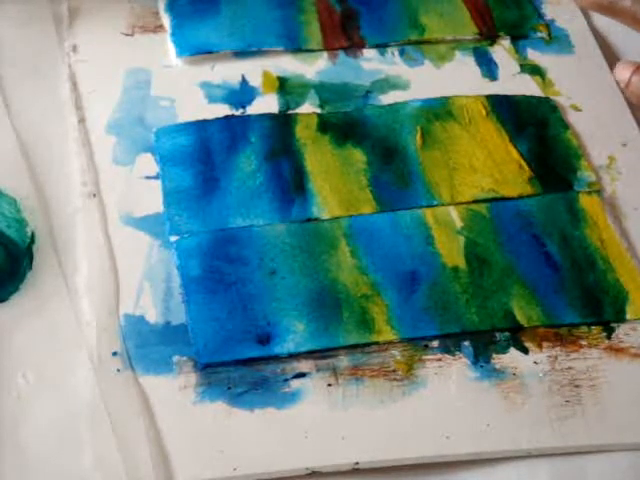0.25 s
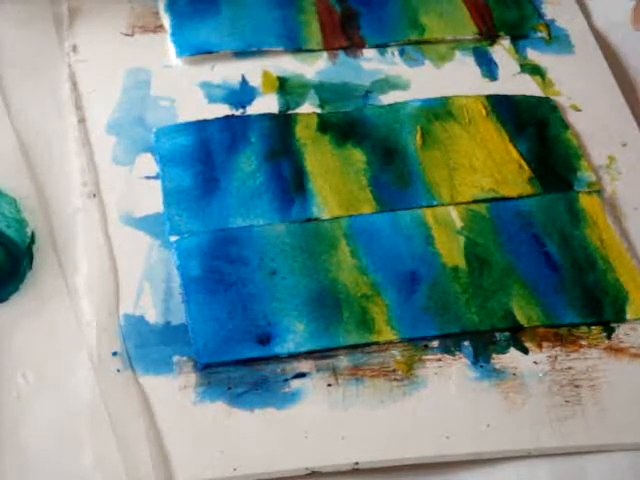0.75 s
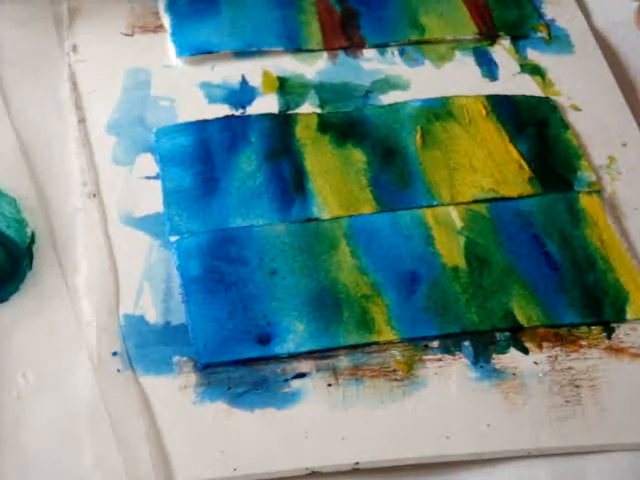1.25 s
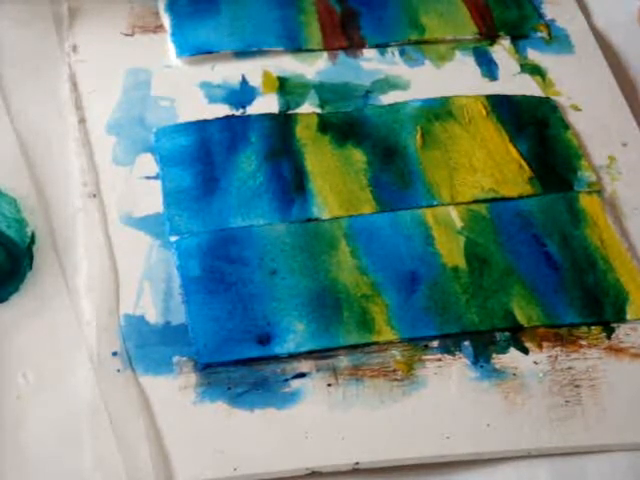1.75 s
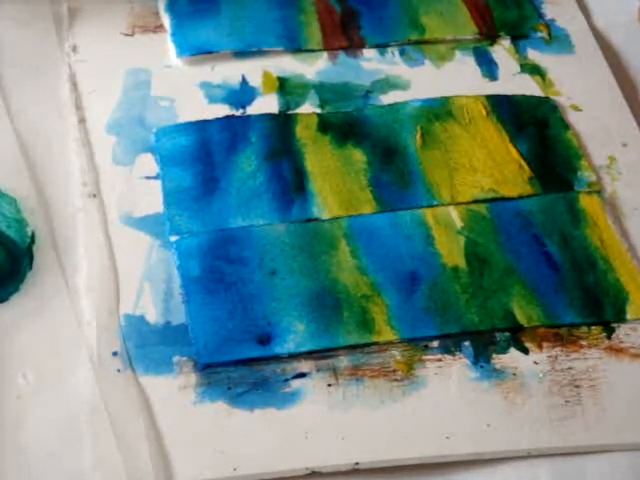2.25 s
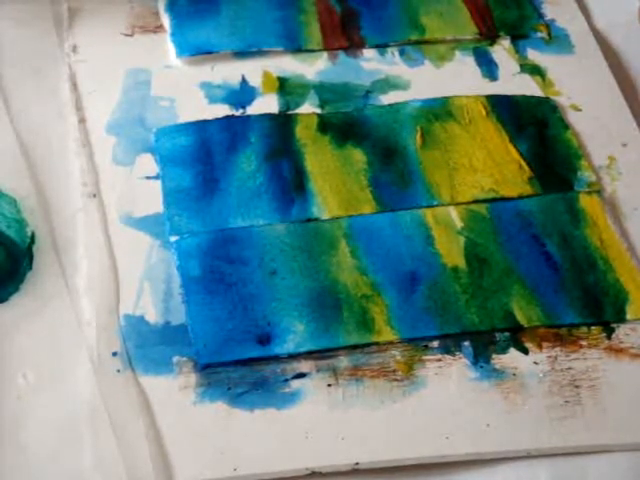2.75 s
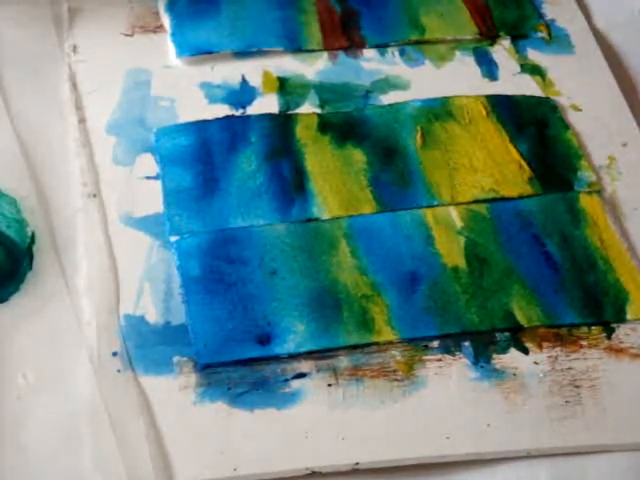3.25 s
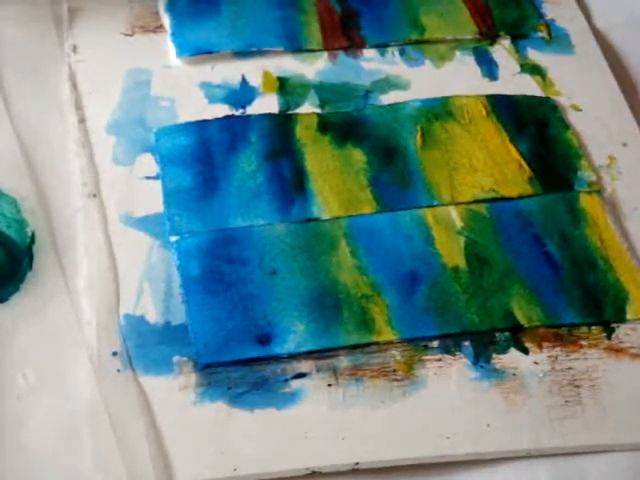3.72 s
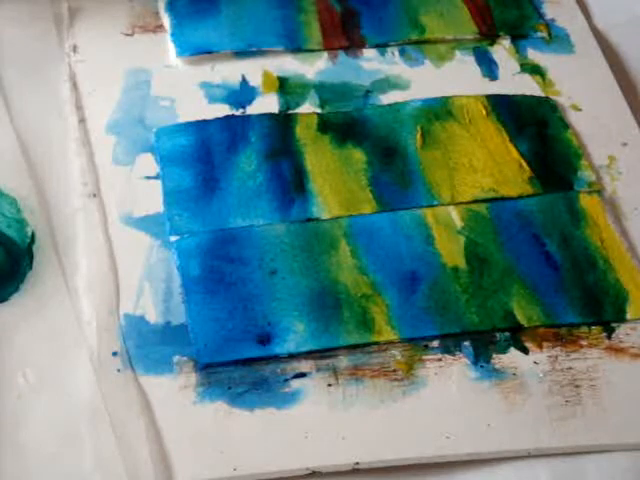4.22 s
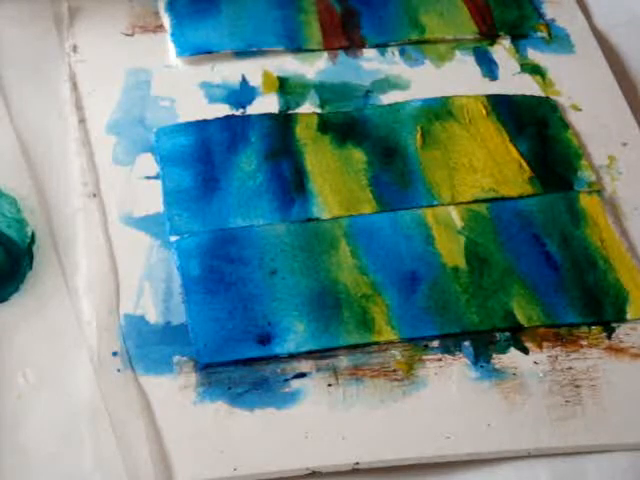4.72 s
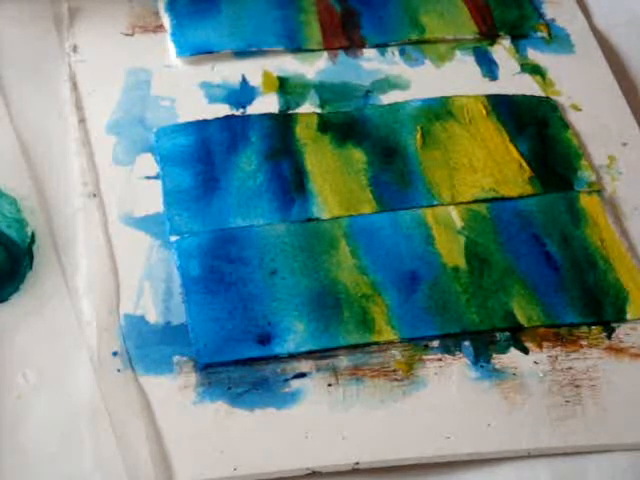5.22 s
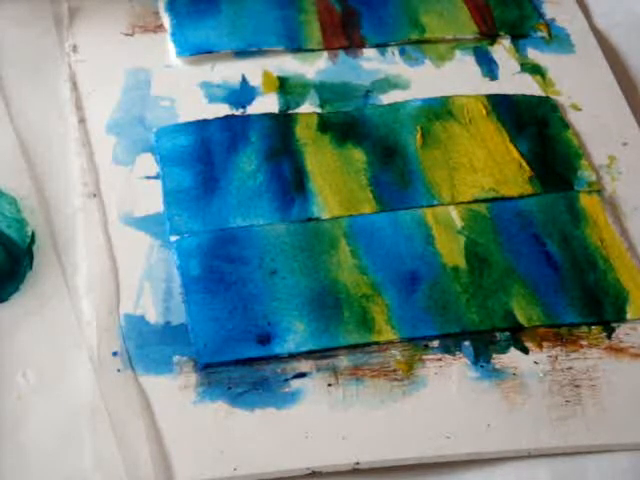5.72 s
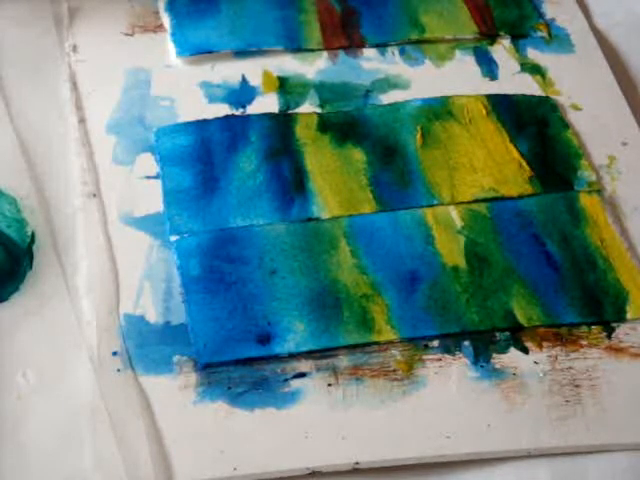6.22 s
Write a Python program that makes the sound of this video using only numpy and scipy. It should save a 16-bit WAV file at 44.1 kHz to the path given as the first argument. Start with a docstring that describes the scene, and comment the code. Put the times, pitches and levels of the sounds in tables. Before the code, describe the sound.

Light, quickly damped clinks of a paintbrush against a water jar open the scene, running into a series of duller dabs and gentle sloshing. The water settles into sparse, high drips and one small gurgle. Near the end comes a single crisp tap on a table with a slight rebound, then short, soft bristle wipes. Everything sounds near, over the faint hiss of a small room.

```python
"""In a small, quiet room a paintbrush is rinsed in a jar of water. Its handle clinks on the wall and
its bristles are dabbed on the bottom, each impact exciting the jar's damped modes. Stirring and
falling drops trap air, which resonates as bubbles. The brush then taps the table, bounces once
and is wiped in a few short strokes of friction noise."""
import sys
import numpy as np
from scipy import signal
from scipy.fft import rfft, irfft, next_fast_len
from scipy.io import wavfile

SR = 44100
rng = np.random.default_rng(int(sys.argv[2]) if len(sys.argv) > 2 else 0)


def generate_wav(signal):
    """Clip the signal to [-1, 1] and save it as 16-bit WAV at the path in sys.argv[1]."""
    frames = np.transpose(np.atleast_2d(signal))
    scaled = np.clip(frames, -1, 1) * 32767
    pcm = np.round(scaled).astype(np.int16)
    wavfile.write(sys.argv[1], SR, pcm)


N = 285282
TIME = np.arange(N) / SR
RING_TIME = TIME[:SR // 2]
TOP_HZ = 10250

# modes of the damped jar, plus the low thump of the table beneath it: pitch_hz, level_db, t60_s
JAR_ON_TABLE = [(133.4, -29.5, 0.21), (311, -24.5, 0.079), (570, -9, 0.042), (745.7, -15, 0.046),
                (920, -10, 0.031), (1059, -2.5, 0.027), (1156, -2, 0.035), (1405, -4, 0.013),
                (1845, -7, 0.027), (2145, -5.5, 0.025), (2360, -1.5, 0.015), (2600, -5.5, 0.02),
                (2957, -1, 0.016), (3280, -1, 0.016), (3690, -2.5, 0.025), (4100, -2.5, 0.017),
                (4606, 0, 0.0095), (5300, -2, 0.0065), (6250, -0.5, 0.0046), (7570, -11, 0.005),
                (8500, -11, 0.0024)]
# drops that trap a distinct bubble: start_s, level_db, pitch_hz
DROPS = [(.536, -36.5, 1930), (.747, -34, 1160), (0.807, -26.5, 3140), (0.9, -34, 3830), (.914, -29, 1980),
         (.9250, -19.5, 3950), (1.005, -30.5, 1890), (1.352, -29.5, 2020), (1.353, -31.5, 3280),
         (2.066, -32.5, 4100), (2.092, -32, 2650), (2.124, -39, 1150), (2.158, -33.5, 3040),
         (2.368, -32, 3090), (2.691, -40.5, 2300), (2.747, -41, 4200), (3.502, -27.5, 2450),
         (3.507, -32.5, 2750), (3.707, -31, 2490), (3.733, -34.5, 1565), (3.840, -37.5, 1213),
         (3.842, -36, 2040)]


def amp(db):
    """Decibels express an amplitude ratio on a logarithmic scale."""
    return 10 ** (np.asarray(db) / 20)


def unit_rms(x):
    """Normalisation to unit mean power."""
    return x / np.sqrt(np.mean(x ** 2) + 1e-20)


def curve_at(points, hz):
    """Interpolation of (frequency_hz, value) points on a logarithmic frequency axis."""
    knots_hz, values = np.transpose(points)
    return np.interp(np.log(hz + 1), np.log(knots_hz), values)


def add(track, start_s, sound):
    """Superposition: a delayed sound sums into the track."""
    part = track[round(start_s * SR):][:len(sound)]
    part += sound[:len(part)]


def swell(movements, attack_share, depth_db=19.5):
    """Incoherent addition: envelopes that rise and fall exponentially sum in power."""
    power = np.zeros(N)
    for peak_s, db, length_s in movements:
        away = np.maximum((peak_s - TIME) / attack_share, (TIME - peak_s) / (1 - attack_share))
        power += amp(db - depth_db * np.minimum(away / length_s, 10)) ** 2
    return np.sqrt(power)


def coloured(x, spectrum):
    """Causal, minimum-phase filtering through (frequency_hz, gain_db) points."""
    size = 2 * next_fast_len(len(x))
    cepstrum = irfft(np.log(amp(curve_at(spectrum, np.fft.rfftfreq(size, 1 / SR)))))
    cepstrum[1:size // 2] *= 2
    cepstrum[size // 2 + 1:] = 0
    return irfft(rfft(x, size) * np.exp(rfft(cepstrum)))[:len(x)]


def noise(spectrum):
    """Spectral shaping of white noise, at unit power."""
    return unit_rms(coloured(rng.standard_normal(N), spectrum))


def burst(t60_s):
    """A broadband transient: white noise in exponential decay."""
    return rng.standard_normal(len(RING_TIME)) * amp(-60 * RING_TIME / t60_s)


def ring(modes, scatter_db):
    """Free vibration: a sum of damped modes of scattered strength and alternating sign."""
    hz, db, t60_s = np.transpose(modes)[:, :, None]
    signs = (-1) ** np.arange(len(db))[:, None]
    strength = signs * amp(db + scatter_db * rng.standard_normal(db.shape))
    return np.sum(strength * amp(-60 * RING_TIME / t60_s) * np.sin(2 * np.pi * hz * RING_TIME), axis=0)


def room_noise():
    """The noise floor: steady broadband sound, strongest in the low middle range."""
    # ambient spectrum: frequency_hz, density_db
    spectrum = [(15, -51), (25, -26), (156, -6), (181, -3.5), (233, -1.5), (322, -1), (519, -1.5),
                (560, -1), (924, -3.5), (1560, -6.5), (2170, -8), (3240, -10.5), (4370, -12.5),
                (8600, -15.5), (10000, -18.5), (13000, -105.5), (22000, -120)]
    return noise(spectrum)


def in_room(x, wet_db, standing_db=-55, wall_db=-11, wall_delay_s=0.0122):
    """Convolution with the room's response: direct sound, one reflection, diffuse tail, standing waves."""
    # reverberation time: frequency_hz, t60_s
    decay_times = [(150, 0.31), (400, 0.56), (1000, 0.32), (3000, 0.32), (8000, 0.31)]
    # colour of the diffuse tail: frequency_hz, gain_db
    tail_colour = [(120, -4), (250, -4.5), (450, -3.5), (900, 0), (2500, 0), (9000, -5)]
    # standing waves of the room and furniture: pitch_hz, level_db, t60_s
    standing_waves = [(135, -11.5, 0.24), (313.2, -2, 0.39), (398, 0.5, 0.47), (456, 0.5, 0.45),
                      (577, -6, 0.29), (648, -2, 0.58), (766, -7.5, 0.32), (907, -5.5, 0.33),
                      (1011, -9, 0.16), (1162, -9.5, 0.42), (1180, -12.5, 0.25)]
    hz, t, bands = signal.stft(rng.standard_normal(len(RING_TIME)), SR, nperseg=256)
    bands *= amp(-60 * t / curve_at(decay_times, hz)[:, None])
    tail = signal.istft(bands, SR, nperseg=256)[1][:len(RING_TIME)]
    tail *= 1 - np.exp(-RING_TIME / 0.003)  # the diffuse field builds up
    echoes = amp(wet_db) * coloured(tail / np.linalg.norm(tail), tail_colour)
    echoes += amp(standing_db) * ring(standing_waves, scatter_db=1)
    direct = 1.0 * (RING_TIME == 0)
    add(echoes, wall_delay_s, amp(wall_db) * coloured(direct, [(600, 2.5), (1500, -7), (6000, -7.5)]))
    return signal.fftconvolve(x, direct + echoes)[:len(x)]


def shuffles():
    """Structure-borne sound: something soft shifts on the table and is heard through its top."""
    # movements on the table: peak_s, level_db, length_s
    shifts = [(.463, -47, .075), (3.395, -52.5, .17)]
    # dull spectrum of the table top: frequency_hz, density_db
    thud = [(25, -16), (130, -18), (230, 2.5), (450, -1.5), (800, -4.5), (2000, -25), (8000, -46)]
    return in_room(noise(thud) * swell(shifts, attack_share=0.48), wet_db=3)


def wipes(grain_db=3.5):
    """Friction noise: many bristles slip at once, giving a grainy hiss under each stroke."""
    # drying strokes: peak_s, level_db, length_s
    strokes = [(4.775, -52, 0.13), (5.724, -37, 0.069), (5.82, -52, .22), (6.078, -49, 0.18),
               (6.345, -54.5, .24)]
    # hiss of the bristles: frequency_hz, density_db
    spectrum = [(100, -21), (350, 1.5), (1200, 2.5), (2600, 3), (4000, -1.5), (7000, -3.5), (10000, -9.5)]
    grain = amp(grain_db * noise([(300, 7), (1200, -21), (5000, -55)]))
    hiss = unit_rms(grain * noise(spectrum))
    return in_room(hiss * swell(strokes, attack_share=0.32), wet_db=-7)


def ticks():
    """Impact without resonance: tiny, bright ticks against the jar's wall."""
    # the handle rebounds after its first clink, then two faint specks: start_s, peak_db
    contacts = [(0.243, -25.5), (2.241, -31), (4.068, -36)]
    # colour of a tick: frequency_hz, gain_db
    tick_colour = [(1000, -17), (4500, -2), (7200, 1), (10000, -3.5)]
    track = np.zeros(N)
    for start_s, db in contacts:
        tick = coloured(burst(t60_s=0.014), tick_colour)
        add(track, start_s, amp(db) * tick / np.abs(tick).max())
    return in_room(track, wet_db=-3)


def bubble(hz, cycles, rise_octaves, attack_s=0.00018):
    """Bubble resonance: trapped air rings down 60 dB in about `cycles`, rising as it nears the surface."""
    t60_s = cycles / hz
    t = RING_TIME[:int(t60_s * SR) + 2]
    pitch_hz = hz * 2 ** (rise_octaves * t / t60_s)
    wave = np.sin(2 * np.pi * np.cumsum(pitch_hz) / SR)
    return wave * amp(-60 * t / t60_s) * (1 - np.exp(-t / attack_s))


def slosh(count=3200, until_s=4.0, centre_hz=2100, log_spread=0.49, scatter_db=4):
    """Air entrainment: stirring and falling drops make a crowd of small, short-lived bubbles."""
    # the brush stirs the water: peak_s, relative_db, length_s
    stirs = [(.45, -58, 0.11), (.945, -40, 0.21), (1.05, -46.5, 0.35), (1.42, -55, 0.79), (2.14, -54, .25),
             (2.30, -55.5, 0.48)]
    crowd = np.zeros(N)
    for start_s, pitch, size in zip(rng.uniform(0, until_s, count), *rng.standard_normal((2, count))):
        hz = np.clip(centre_hz * np.exp(log_spread * pitch), 1000, TOP_HZ)
        add(crowd, start_s, amp(scatter_db * min(size, 2)) * bubble(hz, cycles=14, rise_octaves=0.25))
    # each drop leaves a faint, brief wake of fine bubbles
    wakes = swell([(start_s, db - 26, 0.14) for start_s, db, _ in DROPS], attack_share=0.073)
    motion = np.hypot(swell(stirs, attack_share=0.41), wakes)
    return in_room(crowd / np.std(crowd[crowd != 0]) * motion, wet_db=-5)


def glug(peak_s=3.585, level_db=-40, length_s=0.08, pitch_hz=1014, octaves_per_s=18.8, froth=0.83):
    """Cavity resonance: water drains off the bristles and a closing, frothy pocket whoops upward."""
    hz = pitch_hz * 2 ** np.clip(octaves_per_s * (TIME - peak_s), -0.6, 0.35)
    flutter = [noise([(170, 0), (340, -14), (1360, -50)]) for _ in range(2)]
    modulation = 1 + froth * (flutter[0] + 1j * flutter[1])  # in amplitude and phase
    cavity = modulation * np.exp(2j * np.pi * np.cumsum(hz) / SR)
    envelope = swell([(peak_s, level_db, length_s)], attack_share=0.64)
    return in_room(envelope * unit_rms(cavity.real), wet_db=-8.5)


def drops(splat_db=-10):
    """Drop impact: a tiny splat sets a bubble ringing; small, high bubbles die soonest."""
    track = np.zeros(N)
    for start_s, db, hz in DROPS:
        splat = coloured(burst(t60_s=0.03), [(hz / 4, -10), (hz, 5), (2 * hz, -5), (4 * hz, -10)])
        plink = amp(splat_db) * splat
        add(plink, 0, bubble(hz, cycles=59, rise_octaves=0.16))
        add(track, start_s, in_room(amp(db) * plink, wet_db=-4))
    return track


def strikes(blows, modes, crack_db, crack_t60_s, wet_db, click_db):
    """Impact excitation: each blow cracks and rings the modes; soft contact favours bass over treble."""
    track = np.zeros(N)
    for start_s, peak_db, bass_db, treble_db, click_hz in blows:
        crack = amp(crack_db) * burst(crack_t60_s)
        contact = [(60, bass_db - 17.5), (150, bass_db), (600, bass_db), (1150, 0.46 * bass_db),
                   (2600, 0.0066), (7000, treble_db)]
        blow = coloured(ring(modes, scatter_db=2) + crack, contact)
        # the point of contact sets the pitch of the click
        blow = coloured(blow, [(click_hz / 1.52, 0), (click_hz, click_db), (click_hz * 1.43, 0)])
        add(track, start_s, in_room(amp(peak_db) * blow / np.abs(blow).max(), wet_db))
    return track


def table_taps():
    """Plate vibration: the brush strikes the table top and rebounds once."""
    # tap and bounce: start_s, peak_db, bass_db, treble_db, click_hz
    taps = [(5.2167, -15.5, 2.5, 0.5, 1500), (5.2775, -32, 6, 0, 3800)]
    # modes of the table top: pitch_hz, level_db, t60_s
    modes = [(243, -22, .1), (310, -17, 0.08), (565, -15, 0.061), (940, -2, 0.01), (1130, -1.5, 0.022),
             (1503, -2, 0.025), (1910, -4.5, 0.01), (2110, -4, 0.024), (2556, -1, 0.025), (3060, -1, 0.011),
             (3480, -1, 0.017), (4100, 0.5, 0.014), (5170, -6.5, 0.0038), (7500, -13, 0.0016)]
    return strikes(taps, modes, crack_db=-4.5, crack_t60_s=0.0035, wet_db=-3.5, click_db=-0.5)


def dabs(gentle_db=-22, bass_db=18.5, bass_loss_per_db=1.06, bottom_hz=1030):
    """Cushioned impact: bristles soften each blow on the bottom, less so when pressed hard."""
    # bristles meet the bottom: start_s, peak_db, treble_db
    contacts = [(0.9411, -22, -5), (1.0776, -15, -6.5), (1.2211, -22.5, -5), (1.3662, -23, -11),
                (1.5124, -21.5, -10), (1.6573, -22, -20), (1.8095, -23.5, -36)]
    blows = [(start_s, db, bass_db - bass_loss_per_db * (db - gentle_db), treble_db, bottom_hz)
             for start_s, db, treble_db in contacts]
    return strikes(blows, JAR_ON_TABLE, crack_db=-13, crack_t60_s=0.036, wet_db=-1, click_db=2.5)


def clinks(firm_db=-12.5, bass_db=-3):
    """Hard impact: the firmer the handle hits the jar's wall, the more it excites the high modes."""
    # handle meets the wall: start_s, peak_db, click_hz
    contacts = [(0.2332, -17, 2900), (0.3986, -11, 4440), (0.4678, -23.5, 3300), (0.554, -19.5, 3830),
                (.6068, -13.5, 2840), (.9510, -16.5, 3240), (1.2700, -27.5, 2190), (1.4143, -29, 2300)]
    blows = [(start_s, db, bass_db, db - firm_db, click_hz) for start_s, db, click_hz in contacts]
    return strikes(blows, JAR_ON_TABLE, crack_db=-13, crack_t60_s=0.051, wet_db=-0.5, click_db=4.5)


def scene():
    """Superposition of jar, table, water and rubbing over the room's noise, in one channel."""
    jar = clinks() + dabs()
    table = table_taps()
    water_and_ticks = drops() + ticks() + glug() + amp(3.5) * slosh()
    rubbing = wipes() + shuffles()
    return (jar + table + water_and_ticks + rubbing + amp(-52) * room_noise())[None]


def record(dry):
    """Band limiting: a linear-phase low-pass removes the highest treble."""
    low_pass = signal.firwin(255, TOP_HZ, fs=SR)
    return signal.fftconvolve(dry, low_pass[None], mode="same", axes=1)


dry = scene()
out = record(dry)
generate_wav(out)
```